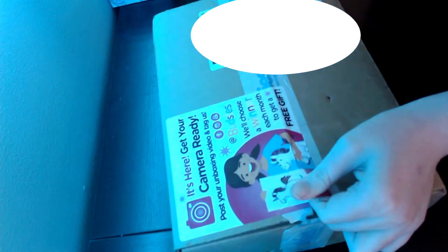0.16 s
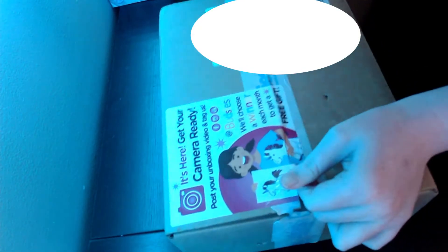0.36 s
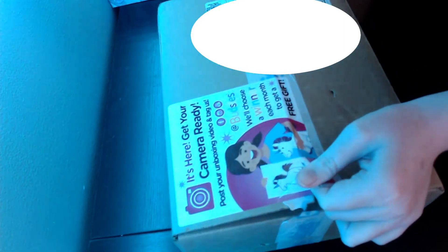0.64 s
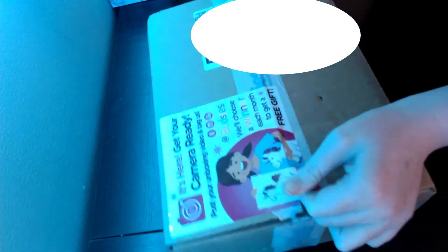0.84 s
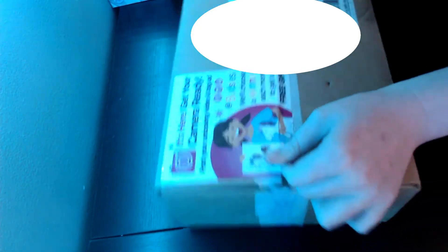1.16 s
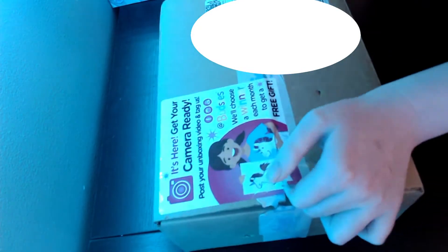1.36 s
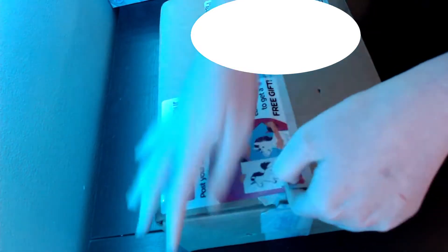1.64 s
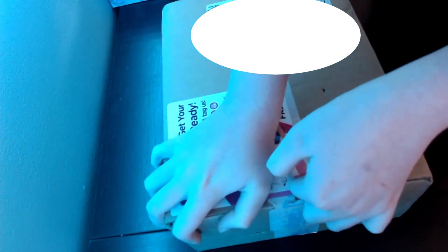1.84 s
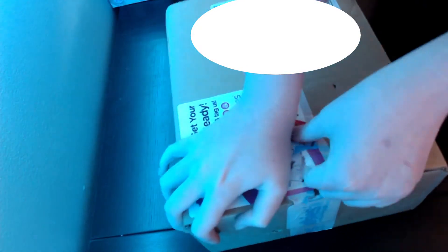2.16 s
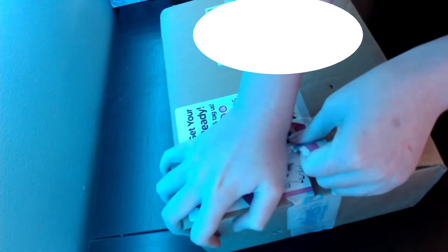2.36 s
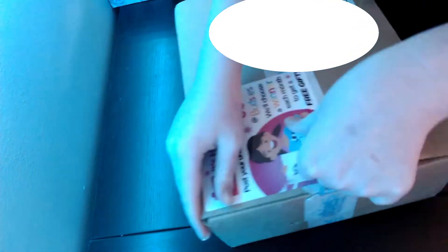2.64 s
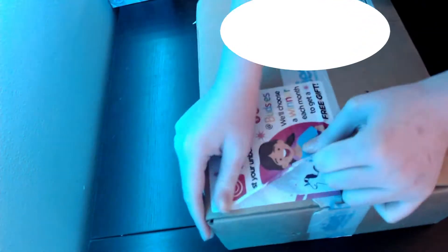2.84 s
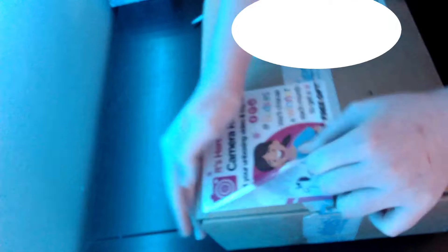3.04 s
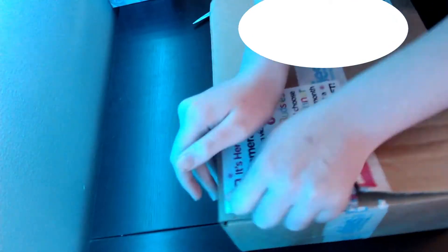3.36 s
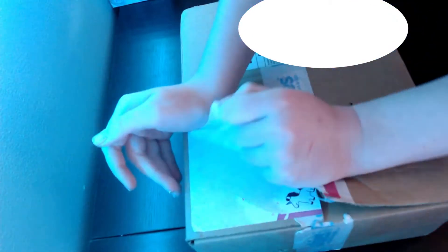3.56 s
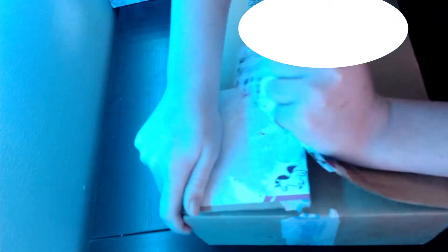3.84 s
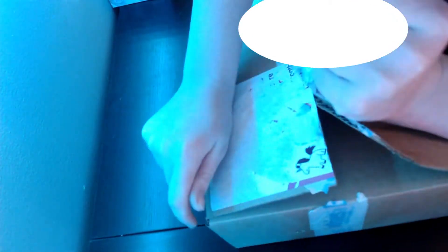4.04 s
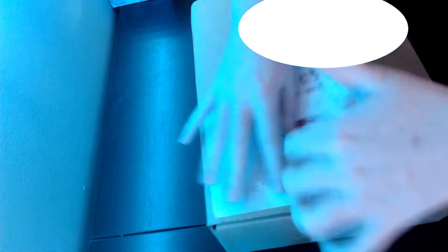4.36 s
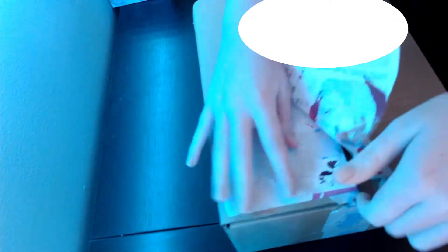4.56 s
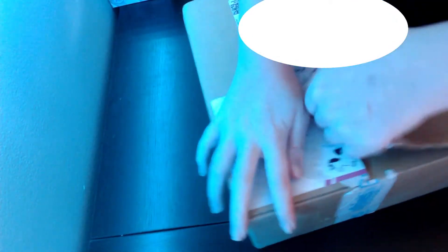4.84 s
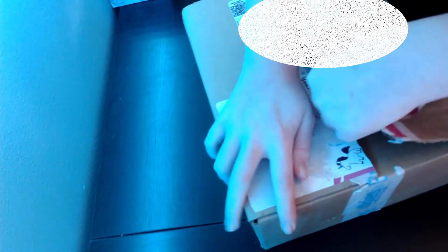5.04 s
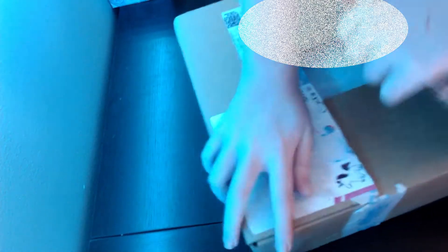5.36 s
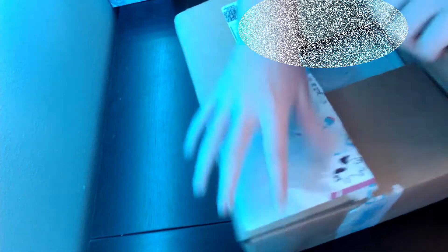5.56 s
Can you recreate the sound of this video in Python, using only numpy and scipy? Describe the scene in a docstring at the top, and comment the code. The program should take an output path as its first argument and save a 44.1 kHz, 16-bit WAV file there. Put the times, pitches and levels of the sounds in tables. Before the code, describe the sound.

Fingernails pick and scrape at tape and a paper label on a hollow cardboard box, then the flap bursts open with a loud ripping boom.

```python
"""Picking and tearing tape off a cardboard box

Fingernails pick and scrape at packing tape on a box, close to a small microphone in a dry room: random
stick-slip impulses and short noise bursts are filtered by the film, nail, lid and hollow box. A label peels
off in gritty pulls; then the last tape bursts, the flap booms in decaying modes and overloads the microphone,
and cardboard slides over cardboard as filtered noise, with a few cracks and a short sine-wave squeak."""
import sys
import numpy as np
from scipy import signal
from scipy.fft import rfft, irfft, next_fast_len
from scipy.io import wavfile
from scipy.ndimage import uniform_filter1d, map_coordinates

SR = 44100
rng = np.random.default_rng(int(sys.argv[2]) if len(sys.argv) > 2 else 0)


def wav_out(sig):
    """Save sig, one row per channel (or a flat mono array), as 16-bit PCM at SR to the path in sys.argv[1]."""
    wavfile.write(sys.argv[1], SR, np.round(np.clip(np.atleast_2d(sig).T, -1, 1) * 32767).astype(np.int16))


N = 251370
T = np.arange(N) / SR
HIT_T = np.arange(SR // 4) / SR  # the quarter second of one hit

# The nail slips off the edge of the tape. Each row: start in seconds, level in dB, nail bite in dB relative
# to the level, press on the lid in dB relative to the level, lid note in Hz.
PICK_EVENTS = [(0.0538, -43.5, 6, 12, 920), (0.2469, -24, 3.5, 6.5, 1140), (0.3069, -21, -0.5, -0.5, 1180),
               (0.5784, -28, -8, 0, 1150), (0.73, -24.5, 4, 0, 1040), (0.7819, -24.5, -3, -5, 1130),
               (.93, -36, 0, 4, 1000), (1.075, -29, -1, 5.5, 995), (1.2467, -43, -4, 6.5, 780),
               (1.3063, -31, 4, -11, 1190), (1.313, -14, -16.5, -16.5, 1370), (1.333, -29.5, -7, -3, 1010),
               (1.3846, -19, -1, -6.5, 1130), (1.3964, -15, -6.5, -7, 850), (1.6326, -33.5, 0.5, 2, 1110),
               (1.8779, -34, -2.5, 8.5, 860), (2.362, -19, -20, -6, 1080), (2.999, -13.5, -18.5, -1, 980),
               (3.027, -19, -6, -6, 895), (3.067, -29, -3.5, -3, 1090), (3.1804, -31, -0.5, -20, 1140),
               (3.6026, -28, -6, 8, 904), (3.7931, -19, -1, -5, 1100), (4.0383, -1, -10.5, -4, 1217),
               (4.0412, -4, -23, -8.5, 1240), (4.0486, -9.5, -6.5, -19, 1210), (4.307, -25, -9, -2.5, 1110),
               (4.38, -32, 1.5, 2, 753), (4.5128, -37, -1, 3, 950)]


def picks():
    """Stick-slip release: the nail drags for a few milliseconds, then slips and excites film, lid and box."""
    out = np.zeros(N)
    for s, db, bite_db, press_db, note_hz in PICK_EVENTS:
        add(out, s + 0.0007, pick(db, bite_db, press_db, note_hz, slip_s=0.015))
        drag = coloured(slips(rate=1400, spread_db=5.5, clump_db=2, size=SR // 100), NAIL_SPECTRUM)
        growth = np.linspace(0, 1, len(drag))
        add(out, s - len(drag) / SR + 0.00101, amp(db - 30) * unit(drag) * growth)
    return out


# The tape film snaps by itself, barely touching the lid. Each row: start in seconds, level in dB.
SNAP_EVENTS = [(0.1216, -26), (1.582, -35), (1.6753, -14.5), (1.714, -19.5), (1.7972, -25), (1.8034, -22.5),
               (2.088, -16.5), (2.1136, -23.5), (2.1707, -9), (2.247, -33.5), (2.3157, -29.5),
               (2.5296, -36), (2.607, -23), (2.6473, -29), (2.6616, -11), (2.959, -22), (3.8054, -12.5),
               (3.9379, -20), (4.017, -16), (4.1038, -24), (4.126, -21.5), (4.14, -22), (4.1622, -28),
               (4.193, -23), (4.2994, -24.5), (4.3916, -24.5), (4.4272, -21.5), (4.527, -27),
               (4.646, -22.5), (4.7063, -19), (4.7244, -23), (4.7535, -18.5), (5.2179, -18.5)]


def snaps():
    """Impulse response of the film: a free snap starts with one dry, needle-sharp click."""
    out = np.zeros(N)
    needle = coloured(signal.unit_impulse(len(HIT_T)), FILM_TICK_SPECTRUM)
    needle /= np.abs(needle).max()
    for s, db in SNAP_EVENTS:
        snap = pick(db, bite_db=-33, press_db=-26, note_hz=907, slip_s=0.0091)
        add(out, s + 0.00062, amp(db) * needle + snap)
    return out


# Tick of the tape film. Each row: frequency in Hz, gain in dB.
FILM_TICK_SPECTRUM = [(300, -32), (2000, -12), (4000, -5.5), (5500, 0), (7500, -4.5), (11000, -1),
                      (14500, 1), (16000, 0)]
# Bite of the nail edge. Each row: frequency in Hz, gain in dB.
NAIL_SPECTRUM = [(400, -11), (1200, 2), (1750, 2), (2300, 1), (3000, -4.5), (4300, -0.5), (5500, -7),
                 (9000, -13.5), (16000, -14)]
# Resonances of the taped lid. Each row: multiple of its note, width in Hz, gain in dB.
LID_MODES = [(.7, 163, -1), (1, 144, 6), (1.5, 301, -8.5)]


def pick(db, bite_db, press_db, note_hz, slip_s):
    """Coupled excitation: one slip ticks the film and nail edge; a firmer press drives lid and box harder."""
    tick = peak(room(coloured(snag(slip_s), FILM_TICK_SPECTRUM), wet_db=-4))
    bite = peak(room(coloured(snag(t60=0.017), NAIL_SPECTRUM), wet_db=-4.5))
    # the lid's note depends on where the nail catches it
    clack = peak(room(resonate(jolt(t60=0.004), lid(note_hz)), wet_db=-3.5))
    hollow = knock(np.sqrt(note_hz / 907))
    edge = amp(0.3) * tick + amp(bite_db + 2.5) * bite
    # the knock grows by 0.82 dB per dB of press
    box = amp(press_db + 1) * clack + amp(-4.5 + 0.82 * press_db) * hollow
    return amp(db) * (edge + box)


# The nail scrapes along the tape. Each row: start in seconds, end in seconds, rasp level in dB.
SCRAPE_EVENTS = [(0.048, 0.1, -54), (0.192, 0.27, -48.5), (0.535, 0.584, -54.5), (0.639, 0.75, -57),
                 (0.755, 0.829, -49.5), (0.921, 1.031, -52), (1.039, 1.124, -49), (1.576, 1.73, -52.5),
                 (1.808, 2.093, -51.5), (2.32, 2.45, -56.5), (2.454, 2.5, -45.5), (2.574, 2.626, -46.5),
                 (3.246, 3.303, -43.5), (4.578, 4.725, -47.5)]


def scrapes():
    """Continuous friction: the nail scrapes evenly while it stays in contact with the tape."""
    out = np.zeros(N)
    for start, end, db in SCRAPE_EVENTS:
        sound = stroke(db, box_db=0, nail_db=-4.5, strip_db=-35)
        add(out, start, contact(end - start, attack=0.0028) * sound)
    return out


# The label peels off in pulls. Each row: start in seconds, end in seconds, rasp level in dB before the tug,
# setting of the coarse paper slips in dB.
PULL_EVENTS = [(2.643, 2.684, -31.5, -10), (2.688, 2.781, -43, -16), (2.788, 2.898, -46.5, -12),
               (2.936, 3.102, -47.5, -1), (3.301, 3.385, -32, 6.5), (3.39, 3.491, -34, 9.5),
               (3.496, 3.605, -42, 1.5), (3.95, 4.03, -37, -5), (4.084, 4.286, -48, -22),
               (4.695, 4.773, -40, 1)]


def pulls():
    """Peeling friction: extra force starts each pull, and the strip dulls as it grows longer and slack."""
    out = np.zeros(N)
    tug = 1 + amp(-7.5) * fade(T[:SR // 2], t60=0.12)
    for start, end, db, coarse_db in PULL_EVENTS:
        strip_db = 2 - 13 * (start - PULL_EVENTS[0][0])  # falls 13 dB a second from the first pull
        sound = stroke(db, box_db=-6.5, nail_db=coarse_db, strip_db=strip_db)
        add(out, start, contact(end - start, attack=0.0068) * tug * sound)
    return out


# The label lets go in a quick rip that shakes the box. Each row: peak time in seconds, rasp level in dB.
RIP_EVENTS = [(3.714, -27), (3.797, -36.5), (3.899, -32)]


def rips():
    """Unstable peeling: the grit builds exponentially and breaks off, with extra sound from the box."""
    out = np.zeros(N)
    rise, fall = 0.23, 0.11  # 60 dB times in seconds
    envelope = swell(rise, rise, fall)[:SR // 2]
    for s, db in RIP_EVENTS:
        add(out, s - rise, envelope * stroke(db, box_db=2, nail_db=9, strip_db=-11))
    return out


# Rasp of the tape. Each row: frequency in Hz, gain in dB.
TAPE_SPECTRUM = [(880, -21.5), (1650, -15), (2320, -1), (3000, -9), (4870, 0.5), (6560, -6.5), (7100, -12),
                 (7760, -1.5), (11700, -2), (14800, 4), (16000, -7)]
# Resonances of the lifted strip. Each row: frequency in Hz, width in Hz, gain in dB.
STRIP_MODES = [(2410, 170, 1.5), (4400, 750, 2.5), (7080, 510, 0.5), (9160, 410, 5.5)]
# Box under the fingers. Each row: frequency in Hz, gain in dB.
BOX_SPECTRUM = [(30, -27), (68, -4.5), (110, -13), (170, -4), (220, -15), (300, 2.5), (380, -1), (550, -5),
                (800, -1.5), (1100, 1), (1450, -13.5), (1900, -12.5), (3200, -35.5)]


def stroke(rasp_db, box_db, nail_db, strip_db):
    """Rate-dependent stick-slip: half a second of fine grit from the tape and coarser slips through the box."""
    size = SR // 2
    # a faster pull is both louder and denser; a slow one falls apart into ticks
    speed = amp(0.55 * (rasp_db + 32.5))
    force = slips(rate=9000 * speed, spread_db=4.5, clump_db=1.5, size=size)
    # the lifted strip rings over the grit
    film = unit(coloured(force, TAPE_SPECTRUM)) + amp(strip_db) * unit(resonate(force, STRIP_MODES))
    # the edge catches in fewer, coarser slips, which stand out in light strokes
    catches = slips(rate=1500 * speed, spread_db=2.5, clump_db=2, size=size)
    edge = amp(nail_db - 0.5 * (rasp_db + 53.5)) * unit(coloured(catches, NAIL_SPECTRUM))
    grit = patchy(room(film + edge, wet_db=-3), depth_db=2)
    shaking = slips(rate=2200, spread_db=4, clump_db=3.5, size=size)
    body = unit(room(coloured(shaking, BOX_SPECTRUM), wet_db=-4))
    # the box grows by only 0.83 dB per dB of rasp
    body_db = box_db - 49.5 + 0.83 * (rasp_db + 49.5)
    return amp(rasp_db) * grit + amp(body_db) * body


def contact(length, attack):
    """Contact envelope: a linear onset, a steady hold and an exponential release."""
    t = T[:SR // 2]
    return np.clip(t / attack, 0, 1) * fade(np.maximum(t - length, 0), 0.11)


TEAR_S, BURST_S = 4.851, 4.834  # the tape tears fastest; it starts to part
# Rasp of torn and sliding board. Each row: frequency in Hz, gain in dB.
BOARD_SPECTRUM = [(530, -45), (900, -10), (1260, -9.5), (1770, 1.5), (2200, -7.5), (3260, -7), (5890, -2),
                  (10600, -17.5), (16000, -32)]
# Buckling board. Each row: frequency in Hz, gain in dB.
FLUTTER_SPECTRUM = [(80, -34), (110, -26), (150, -4.5), (260, 1), (440, 0), (680, 5), (1000, -7),
                    (1500, -9.5), (2500, -12), (8000, -34)]
# Modes of the freed flap. Each row: frequency in Hz, gain in dB, 60 dB decay time in seconds.
FLAP_MODES = [(107, -12, 0.36), (133.2, -9.5, 0.2), (207.2, -8.5, 0.22), (242.9, -5, 0.18),
              (277, -2.5, 0.19), (316.7, -2, 0.11), (418, -0.5, 0.09), (530, -11, .13), (617.4, 4, 0.083),
              (878, -10, 0.17), (1000, -9.5, 0.17), (1325, -9, 0.12), (1435, -3.5, 0.075), (1540, -6, 0.11)]
# The flap hits its stop and rebounds more softly. Each row: start in seconds, level in dB, upper corner in Hz
# of the modes that the contact wakes.
BLOW_EVENTS = [(4.847, -9.5, 2480), (4.881, -21.5, 330)]


def burst():
    """Fracture and free vibration: the last tape tears in a growing crackle and the freed flap booms."""
    tearing = unit(coloured(slips(rate=2500, spread_db=3.5, clump_db=1.5), BOARD_SPECTRUM))
    tearing *= swell(TEAR_S, 0.35, 0.2) * (T > BURST_S)
    # the last fibres part in coarse snaps that clack the lid
    fibres = unit(resonate(slips(rate=600, spread_db=2.5, clump_db=2), lid(1500)))
    fibres *= swell(4.874, 0.12, 0.059)
    boom_s = BLOW_EVENTS[0][0]
    flutter = unit(coloured(slips(rate=1500, spread_db=1.5, clump_db=2.5), FLUTTER_SPECTRUM))
    flutter *= fade(T - boom_s, 0.18) + amp(-10.5) * (T > BURST_S) * (T < boom_s)
    return amp(-2) * flutter + amp(-10.5) * tearing + amp(-16) * fibres + boom()


def boom():
    """Modal synthesis: bending raises the flap's modes, which sink as it relaxes and waver in phase."""
    out = np.zeros(N)
    # the modes start 6.73 % sharp
    bent_t = np.cumsum(1 + 0.0673 * fade(HIT_T, t60=0.119)) / SR
    onset = 1 - np.exp(-HIT_T / 0.0017)
    for s, blow_db, top_hz in BLOW_EVENTS:
        ring = np.zeros(len(HIT_T))
        for hz, db, t60 in FLAP_MODES:
            cycles = hz * bent_t + rng.random() + 0.13 * wobble(76, size=len(HIT_T))
            level = amp(db) / (1 + (hz / top_hz) ** 4)
            ring += level * fade(HIT_T, t60) * np.sin(2 * np.pi * cycles)
        add(out, s, amp(blow_db) * unit(room(ring * onset, wet_db=-21)))
    return out


# Shoves that slide the flap open. Each row: time of the fastest moment in seconds, relative scrape level in
# dB, 60 dB rise time in seconds, 60 dB fall time in seconds.
SHOVE_EVENTS = [(4.87, -28.5, 0.53, 0.51), (4.986, -27.5, 0.39, 0.13), (5.08, -34.5, 0.87, 0.44),
                (5.23, -45.5, 0.6, 0.3), (5.66, -48.5, 0.49, 0.17)]
# Rumble of the bent board. Each row: frequency in Hz, gain in dB.
RUMBLE_SPECTRUM = [(40, -11), (85, -17), (115, -4.5), (250, -4), (400, -4.5), (800, -10), (2000, -38.5)]
# Flat board gliding. Each row: frequency in Hz, gain in dB.
GLIDE_SPECTRUM = [(1000, -15.5), (1700, -8), (5500, -3), (9000, -8.5), (15000, -24)]


def sliding():
    """Sliding friction: the flap scrapes with each shove, rumbles until it swings free, and fans air."""
    slide_s, swing_s = 4.79, 4.964  # the flap starts to move; it swings free and slows down
    before, after = np.maximum(swing_s - T, 0), np.maximum(T - swing_s, 0)
    power = sum((amp(db) * swell(s, rise, fall)) ** 2 for s, db, rise, fall in SHOVE_EVENTS)
    rasp = coloured(slips(rate=1400, spread_db=2.5, clump_db=2.5), BOARD_SPECTRUM)
    scrape = amp(3) * np.sqrt(power) * patchy(room(rasp, wet_db=-8.5), depth_db=1)
    # the rumble decays by 115 dB a second to the rest under the hand
    rumble = amp(-29.5 - 115 * after) + amp(-52.5)
    rumble *= unit(coloured(slips(rate=1400, spread_db=-0.5, clump_db=1.5), RUMBLE_SPECTRUM))
    # pushed air is strongest as the flap swings free
    draught_spectrum = [(10, -20), (26, -3), (50, -17), (120, -22), (400, -72)]
    draught = amp(-32.5 - 108 * before - 43 * after)
    draught *= unit(coloured(rng.standard_normal(N), draught_spectrum))
    glide = amp(-40.5) * swell(5.385, 0.63, 0.63) * unit(coloured(rng.standard_normal(N), GLIDE_SPECTRUM))
    start = np.clip((T - slide_s) / 0.007, 0, 1)
    return start * (scrape + glide + rumble + draught)


# Creases of the flap giving way. Each row: start in seconds, level in dB, setting of the panel clack in dB
# relative to the level, pitch as a multiple of the usual crease.
CRACK_EVENTS = [(4.805, -11, 4.5, 0.91), (4.835, -4, -1, 0.67), (4.8411, 1, 3, 1.15),
                (4.9133, -20, -7, 1.3), (4.9432, -12.5, 1, 1.16), (4.99, -10, -13, 1.2),
                (5.082, -17, -20, 1.15), (5.107, -4, -5.5, 0.85), (5.2005, -22, -24, 1.1),
                (5.2222, -12, -30, 1.05), (5.3859, -10, -40, 0.89), (5.6274, -23.5, -5, 1.3)]
# Snap of a usual crease. Each row: frequency in Hz, gain in dB.
CRACK_SPECTRUM = [(300, -18), (1500, -12), (3500, 1.5), (5600, 6), (7500, -1.5), (11000, -11.5),
                  (16000, -19)]


def cracks():
    """Brittle release: stiff creases snap, drier and duller than the tape, and excite the panel."""
    out = np.zeros(N)
    for s, db, clack_db, pitch in CRACK_EVENTS:
        spectrum = np.multiply(CRACK_SPECTRUM, [pitch, 1])
        crack = peak(room(coloured(jolt(t60=0.004), spectrum), wet_db=-7.5))
        clack = peak(resonate(jolt(t60=0.0058), lid(1300)))
        add(out, s + 0.0007, amp(db) * (amp(-1) * crack + amp(clack_db - 9) * clack))
    return out


# A board edge squeaks. Each row: peak time in seconds, level in dB, pitch in Hz.
SQUEAK_EVENTS = [(5.639, -40, 794), (5.684, -31.5, 786), (5.696, -44, 1340)]


def squeak(waver=0.005):
    """Periodic stick-slip: regular slips of a board edge sound as a briefly swelling, wavering sine."""
    out = np.zeros(N)
    for s, db, hz in SQUEAK_EVENTS:
        cycles = np.cumsum(hz * (1 + waver * wobble(84))) / SR
        out += amp(db) * swell(s, 0.059, 0.059) * np.sin(2 * np.pi * cycles)
    return out


# Fingertips are set down and knock the hollow box. Each row: start in seconds, peak level in dB.
TAP_EVENTS = [(0.547, -28), (.594, -32), (1.188, -38), (1.974, -37), (2.021, -33), (2.81, -32.5),
              (3.185, -30.5), (3.275, -25.5), (3.6, -20.5), (3.776, -43), (4.521, -22.5), (4.539, -25)]


def taps():
    """Cavity resonance: each fingertip rings the hollow box at a slightly different pitch."""
    out = np.zeros(N)
    for s, db in TAP_EVENTS:
        add(out, s, amp(db) * knock(np.exp(rng.normal(0, 0.029))))
    return out


# Resonances of the whole box. Each row: frequency in Hz, width in Hz, gain in dB.
CAVITY_MODES = [(166, 39, -6), (279.4, 58, 2.5), (364, 54, 6), (521, 232, 0.5), (660, 380, -3)]


def knock(pitch):
    """Cavity resonance: the whole box rings hollow, higher or lower with the place that is touched."""
    return peak(room(resonate(jolt(t60=0.01), np.multiply(CAVITY_MODES, [pitch, 1, 1])), wet_db=-5))


# Soft bumps of the hand on the box. Each row: start in seconds, peak level in dB.
BUMP_EVENTS = [(1.068, -28.5), (3.019, -22.5), (3.041, -23.5), (3.609, -24), (3.636, -29), (4.038, -22),
               (4.806, -36), (4.925, -12), (4.977, -15.5), (5.219, -27), (5.488, -19)]
# Resonances under a soft blow. Each row: frequency in Hz, width in Hz, gain in dB.
THUD_MODES = [(67, 16, -1), (131, 100, -7), (247, 79, 1), (352, 148, -2.5)]


def bumps():
    """Soft impact: the hand's smooth force only wakes the lowest modes of the box."""
    out = np.zeros(N)
    for s, db in BUMP_EVENTS:
        thud = resonate(fade(HIT_T, 0.0028), THUD_MODES)
        add(out, s + 0.0017, amp(db) * peak(room(thud, wet_db=2)))
    return out


# A fingertip drags over the lid. Each row: peak time in seconds, level in dB, lid note in Hz.
RUB_EVENTS = [(.565, -44.5, 1270), (.94, -45.5, 1080), (1.51, -47, 484), (1.86, -51, 292),
              (2.46, -49.5, 450), (2.94, -43.5, 418), (3.47, -37, 790), (3.89, -49, 730), (4.0, -42.5, 434),
              (4.44, -43, 356), (4.775, -40, 372)]


def rubs():
    """Friction-driven resonance: skin sticks and slips in short swells that ring the lid where it is touched."""
    out, size = np.zeros(N), SR // 2
    rise, fall = 0.3, 0.25  # 60 dB times in seconds
    envelope = swell(rise, rise, fall)[:size]
    for s, db, note_hz in RUB_EVENTS:
        drag = resonate(slips(rate=800, spread_db=5, clump_db=2.5, size=size), lid(note_hz))
        add(out, s - rise, amp(db) * envelope * unit(drag))
    return out


# Hands resting and shifting on the box. Each row: time in seconds, crinkle level in dB, box body level in dB.
HANDLING_LEVELS = [(0, -53.5, -54.5), (1.2, -65, -58), (1.6, -55, -54), (2.3, -49, -51.5), (2.8, -47, -55),
                   (4.15, -44, -50.5), (4.45, -53.5, -52), (4.8, -39.5, -42)]
# The fingers let go for a moment. Each entry: time in seconds.
LIFT_TIMES = [.15, .41, .625, .87, 1.16, 1.28, 2.145, 2.29, 2.9]


def handling():
    """Random micro-slips: loose tape crinkles as hands shift on the box, and falls quiet as fingers lift."""
    s, crinkle_db, body_db = np.transpose(HANDLING_LEVELS)
    crinkle, pressure = amp(np.interp(T, s, crinkle_db)), amp(np.interp(T, s, body_db))
    specks = slips(rate=170, spread_db=5.5, clump_db=5)
    specks = coloured(specks, FILM_TICK_SPECTRUM) + amp(3.5) * coloured(specks, NAIL_SPECTRUM)
    specks = patchy(room(specks, wet_db=-2.5), depth_db=2.5)
    body = coloured(slips(rate=420, spread_db=5.5, clump_db=5), BOX_SPECTRUM)
    body = patchy(room(body, wet_db=-8), depth_db=3.5, size=1024)
    # the weight of the hands rocks the whole box on the desk
    rocking = unit(resonate(slips(rate=160, spread_db=0, clump_db=-2.5), [(68, 39, 0)]))
    # each lift is a Gaussian dip of 13 dB
    touch = amp(-13 * sum(np.exp(-((T - lift_s) / 0.017) ** 2) for lift_s in LIFT_TIMES))
    sound = crinkle * specks + pressure * (body + amp(-4) * rocking)
    return np.clip((TEAR_S - T) / 0.027, 0, 1) * touch * sound


# Faint noise of the room. Each row: frequency in Hz, gain in dB.
FLOOR_SPECTRUM = [(22, -25), (67, 0), (217, -2), (354, 3), (545, -14), (1100, -8.5), (2990, -27.5),
                  (4490, -19), (16000, -31)]


def room_noise():
    """Stationary background: steady Gaussian noise, filtered to the colour of the quiet room."""
    return amp(-57) * unit(coloured(rng.standard_normal(N), FLOOR_SPECTRUM))


# Decay of the room. Each row: frequency in Hz, 60 dB decay time in seconds.
ROOM_DECAY = [(150, 0.16), (500, 0.098), (1500, 0.093), (10000, 0.086)]


def room(x, wet_db):
    """Reverberation: direct sound plus the short answer of desk and walls, as decaying noise."""
    hz, t, z = signal.stft(rng.standard_normal(len(HIT_T)), SR, nperseg=256)
    decay = fade(t, along(ROOM_DECAY, hz)[:, None])
    tail = signal.istft(z * decay, SR, nperseg=256)[1]
    tail = np.pad(tail, (SR // 1000, 0))  # the answer comes a millisecond later
    return x + amp(wet_db) * signal.fftconvolve(x, tail / np.linalg.norm(tail))[:len(x)]


def slips(rate, spread_db, clump_db, size=N):
    """Stick-slip: tiny random impulses of uneven size, rate a second, whose strength comes in clumps."""
    chance, strength = rng.random(size), rng.standard_normal(size)
    sign = rng.choice([-1, 1], size)
    level_db = spread_db * np.minimum(strength, 2) + clump_db * wobble(110, size=size)
    return unit((chance < rate / SR) * sign * amp(level_db))


def jolt(t60):
    """Transient excitation: the brief ragged force of one slip."""
    return rng.standard_normal(len(HIT_T)) * fade(HIT_T, t60)


def snag(t60):
    """Relaxation: one slip, then the scattered crackle of the film settling, 3.5 times as long."""
    crackle = slips(rate=720, spread_db=-2.5, clump_db=6, size=len(HIT_T))
    return jolt(t60) + amp(-14.5) * crackle * fade(HIT_T, 3.5 * t60)


def patchy(x, depth_db, size=256):
    """Spectral modulation: every slip excites its own bit of the surface, so the colour keeps shifting."""
    z = signal.stft(x, nperseg=size)[2]
    field = uniform_filter1d(rng.standard_normal(z.shape), size=16, axis=0)  # smooth over frequency
    field = uniform_filter1d(field, size=5, axis=1)  # and over time
    return unit(signal.istft(z * amp(depth_db * unit(field)), nperseg=size)[1][:len(x)])


def lid(note_hz):
    """Modal scaling: the lid's resonances placed at multiples of its note."""
    return np.multiply(LID_MODES, [note_hz, 1, 1])


def resonate(x, modes):
    """Modal filtering: x through parallel (Hz, width Hz, dB) resonances of alternating sign."""
    def response(f):
        total = 0
        for k, (centre, width, db) in enumerate(modes):
            damping = 1j * f * width
            total = total + (-1) ** k * amp(db) * damping / (centre ** 2 - f ** 2 + damping)
        return total
    return filtered(x, response)


def coloured(x, spectrum):
    """Minimum-phase filtering: a causal response with the gain of (Hz, dB) points."""
    def response(hz):
        cepstrum = irfft(np.log(amp(along(spectrum, hz))))
        # fold the cepstrum onto positive time
        cepstrum[1:len(cepstrum) // 2] *= 2
        cepstrum[len(cepstrum) // 2 + 1:] = 0
        return np.exp(rfft(cepstrum))
    return filtered(x, response)


def filtered(x, response):
    """Convolution theorem: x times a complex response of frequency."""
    m = 2 * next_fast_len(len(x) // 2 + 4096)
    return irfft(rfft(x, m) * response(np.fft.rfftfreq(m, 1 / SR)), m)[:len(x)]


def along(points, hz):
    """Logarithmic interpolation: (Hz, value) points on a log frequency axis."""
    f, v = np.transpose(points)
    return np.interp(np.log(hz + 1), np.log(f + 1), v)


def wobble(rate, size=N):
    """Band-limited randomness: a smooth random curve with rate knots a second."""
    knots = rng.standard_normal(int(size * rate / SR) + 4)
    return map_coordinates(knots, [T[:size] * rate])


def swell(s, rise, fall):
    """Exponential envelope: grows to 1 at s seconds and dies away, with 60 dB times."""
    return fade(s - T, rise) + fade(T - s, fall) * (T > s)


def fade(t, t60):
    """Exponential decay: 60 dB in t60 seconds, silent before zero."""
    return np.exp(-np.log(1000) * np.maximum(t, 0) / t60) * (t >= 0)


def amp(db):
    """Decibel law: amplitude ratio of a level in dB."""
    return 10 ** (np.asarray(db) / 20)


def unit(x):
    """Energy normalisation: scale to an RMS of 1."""
    return x / np.sqrt(np.mean(x ** 2) + 1e-20)


def peak(x):
    """Crest normalisation: scale a hit so that its typical crest is 1."""
    return x / np.sqrt(6 * uniform_filter1d(x ** 2, SR // 400).max())


def add(track, s, sound):
    """Superposition: lay a sound into a track at s seconds."""
    part = track[round(s * SR):][:len(sound)]
    part += sound[:len(part)]


def scene():
    """Superposition: all the sounds of the box over the faint noise of the room."""
    nails = picks() + snaps() + scrapes() + pulls() + rips()
    flap = burst() + sliding() + cracks() + squeak()
    hands = taps() + bumps() + rubs() + handling()
    return (nails + flap + hands + room_noise())[None]


def record(dry, top=1.0):
    """Saturation and band limit: the microphone overloads at full scale and keeps nothing from 16 kHz up."""
    clipped = dry[0] / (1 + np.abs(dry[0] / top) ** 8) ** (1 / 8)
    return filtered(clipped, lambda hz: hz < 16000)[None]


dry = scene()
out = record(dry)
wav_out(out)
```